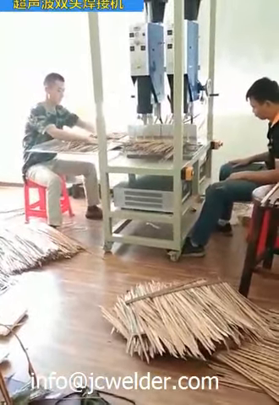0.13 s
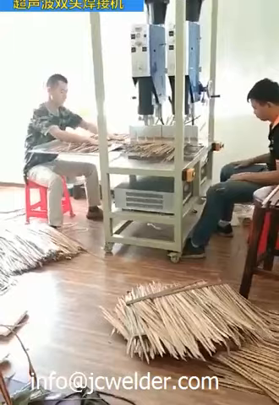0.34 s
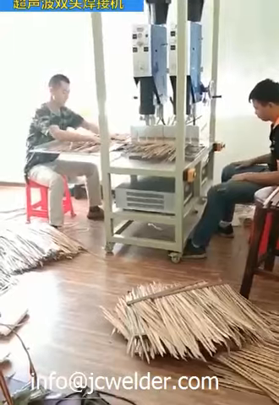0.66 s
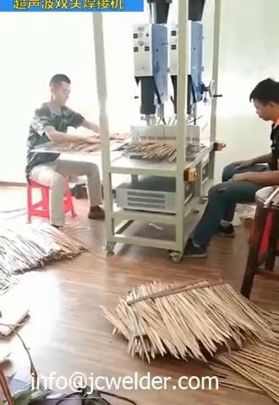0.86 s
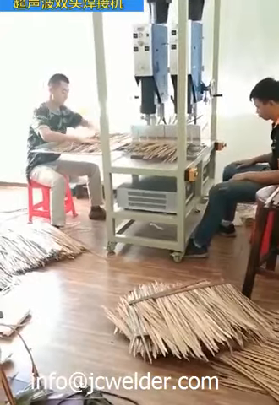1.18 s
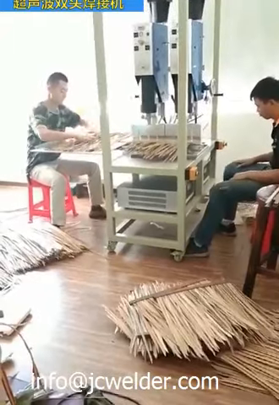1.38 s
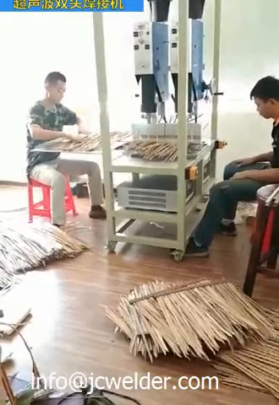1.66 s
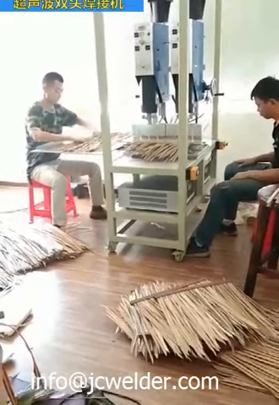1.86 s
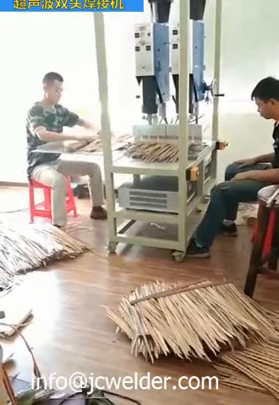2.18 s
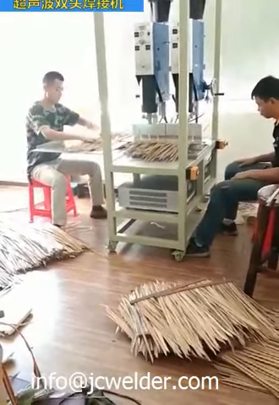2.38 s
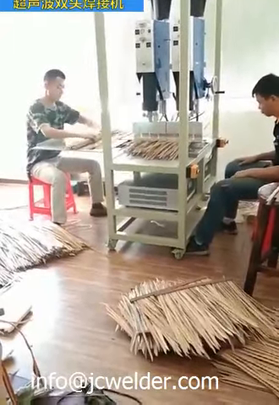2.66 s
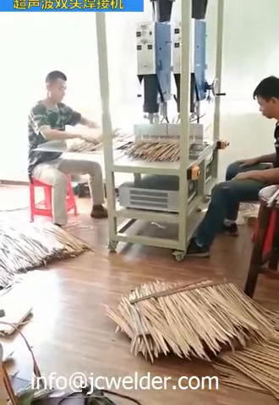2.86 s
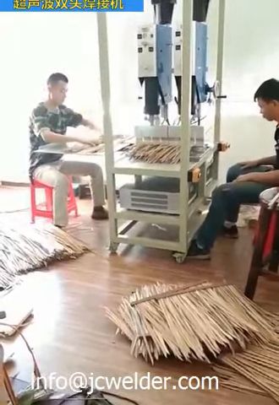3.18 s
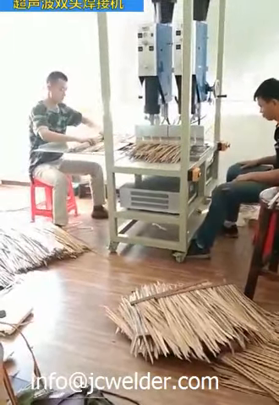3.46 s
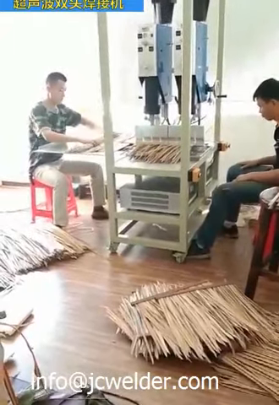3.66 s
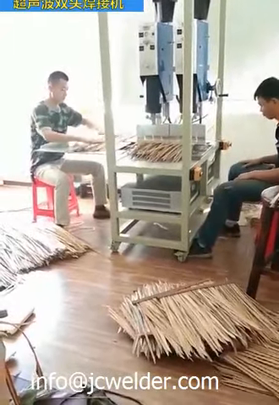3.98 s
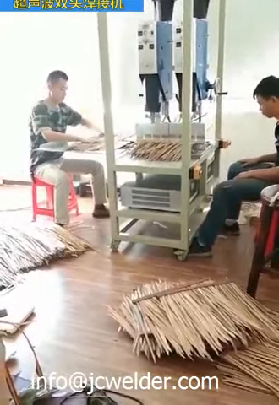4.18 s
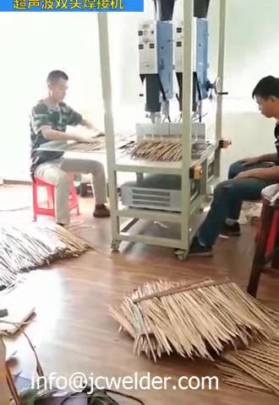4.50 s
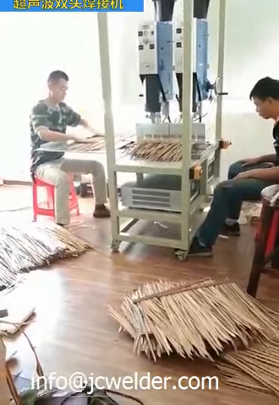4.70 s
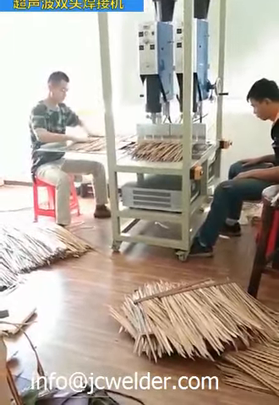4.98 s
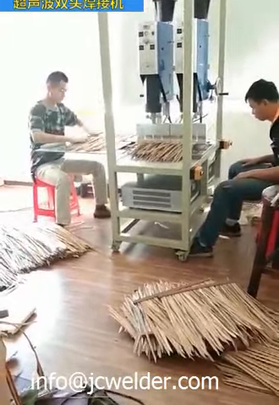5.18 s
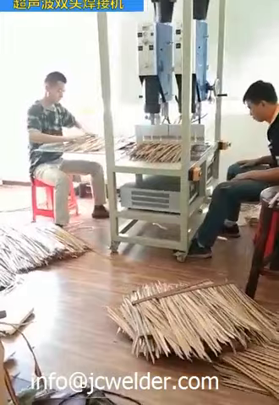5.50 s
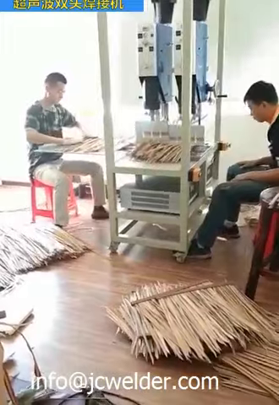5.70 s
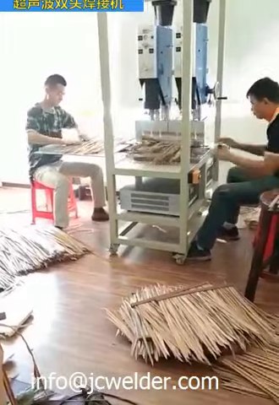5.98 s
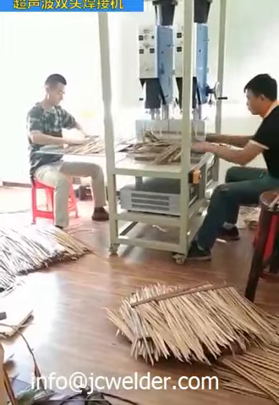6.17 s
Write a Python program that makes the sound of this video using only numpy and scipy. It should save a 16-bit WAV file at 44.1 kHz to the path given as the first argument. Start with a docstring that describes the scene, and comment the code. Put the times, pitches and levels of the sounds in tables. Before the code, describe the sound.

One microphone in a bare, lively room: scratchy, crackling high squeal from a welding horn, rough at first, then a fast regular chatter, then a clean shrill buzz with small steel clinks. It stops abruptly. Handfuls of straw-like plastic slide across a table above beating motors and fan rush. Near the end come a small click, double metallic clack, a short burst of venting air, and final rustles.

```python
"""An ultrasonic welder presses straw-like plastic strips in a hard workshop, heard at one microphone. Its 15 kHz horn
chatters on the work, throwing off a whine at half and a rasp at a quarter of its pitch, then stops. Strips rustle on
the table, a valve clicks, the rams knock and air escapes as they lift: shaped noise, much of it through resonances.
Two motors beat against each other as summed cosines; the horn holds the gain control down while it runs."""
import sys
import numpy as np
from scipy import signal
from scipy.fft import rfft, irfft, next_fast_len
from scipy.io import wavfile
from scipy.ndimage import uniform_filter1d, map_coordinates

SR = 44100
rng = np.random.default_rng(int(sys.argv[2]) if len(sys.argv) > 2 else 0)


def store_wav(level_fs):
    """Save 16-bit WAV to argv[1]."""
    pcm = np.round(np.clip(np.atleast_2d(level_fs), -1, 1) * 32767)
    wavfile.write(sys.argv[1], SR, pcm.T.astype(np.int16))


N = 279585

# All levels are relative: mix gains and the gain control come after them.
HORN_HZ, WELD_END_S = 14912, 2.86
RATTLE_HZ, RATTLE_AT_S = 24.7, 1.984  # rate of the regular rattle, and a moment when its cycle starts
# how the horn bounces, the rest being irregular: (time [s], regular rattle [share 0-1], even buzz [share 0-1])
HORN_CONTACT = [(0, 0, 0), (.6, .1, 0), (1.5, .15, 0), (1.75, .68, 0), (2.0, .93, 0), (2.22, .92, 0),
                (2.33, .55, 0), (2.47, .65, 0), (2.52, .4, .1), (2.56, 0, .96), (2.86, 0, .99)]
# hard bounces in each rattle cycle: (time from the cycle's start [s], strength [0-1])
HARD_BOUNCES = [(-.0178, 1), (-.0105, .65), (0, .9)]
# steel touching steel: (frequency [Hz], level per Hz [dB])
STEEL_TOUCH = [(700, -19), (1300, -3), (2000, -10), (3300, 6), (4500, -2), (5300, -36)]


def amp(db):
    """Decibels to gain."""
    return 10 ** (np.asarray(db) / 20)


def unit(x):
    """Scale to rms 1."""
    return x / np.sqrt(np.mean(x ** 2) + 1e-20)


def clock():
    """The time of every sample in seconds."""
    return np.arange(N) / SR


def along(points, hz):
    """Interpolate (Hz, value) points on a log frequency axis."""
    f, v = np.transpose(points)
    return np.interp(np.log(hz + 1), np.log(f + 1), v)


def curves(rows):
    """One value per sample for each column after the time."""
    s, *cols = np.transpose(rows)
    return [np.interp(clock(), s, c) for c in cols]


def wobble(rate):
    """A smooth random curve, rate knots a second."""
    return map_coordinates(rng.standard_normal(int(N * rate / SR) + 4), [clock() * rate])


def filtered(x, response):
    """x times a response of frequency."""
    size = next_fast_len(N + SR // 2)
    spectrum = rfft(x, size) * response(np.fft.rfftfreq(size, 1 / SR))
    return irfft(spectrum, size)[:N]


def coloured(x, spectrum):
    """x given a spectrum, at rms 1."""
    return unit(filtered(x, lambda hz: amp(along(spectrum, hz))))


def noise(spectrum, grain_db=0, grain_rate=300):
    """Coloured noise, clumped into short grains."""
    return coloured(rng.standard_normal(N) * amp(grain_db * wobble(grain_rate)), spectrum)


def ringing(x, modes, top_hz=5100):
    """x through (Hz, width Hz, dB) resonances of alternating sign, dull above top_hz, at rms 1."""
    def response(f):
        peaks = 0
        for k, (centre, width, db) in enumerate(modes):
            peak = 1j * f * width / (centre * centre - f * f + 1j * f * width)
            peaks = peaks + (-1) ** k * amp(db) * peak
        return peaks / (1 + (f / top_hz) ** 24)
    return unit(filtered(x, response))


def wavering(modes, waver_db, waver_rate=14):
    """Noise in resonances that swell and fade each in its own way, at rms 1."""
    total = 0
    for hz, width, db in modes:
        level = amp(db + waver_db * wobble(waver_rate))
        total = total + level * ringing(rng.standard_normal(N), [(hz, width, 0)])
    return unit(total)


def gate(start, end, fade):
    """1 between two times, with sloping edges."""
    return np.clip(np.minimum(clock() - start, end - clock()) / fade, 0, 1)


def burst(start, end, attack, t60):
    """Rise, hold until the end, then an exponential fall."""
    t = clock()
    return np.clip((t - start) / attack, 0, 1) * amp(-60 * np.maximum(t - end, 0) / t60)


def blow(s, db, t60, attack=0.00024):
    """A sudden start and an exponential fall."""
    return amp(db) * burst(s, s, attack, t60)


def swell(s, half_width):
    """A bell-shaped rise and fall around a middle time."""
    return np.exp(-2 * ((clock() - s) / half_width) ** 2)


def together(envelopes):
    """Unrelated noises add in power."""
    return np.sqrt(np.sum(np.square(envelopes), axis=0))


def room(x, wet_db):
    """The direct sound plus, 5 ms behind, the diffuse answer of the bare walls, at about unchanged power."""
    # the walls' reverberation: (frequency [Hz], t60 [s])
    wall_decay = [(150, .45), (1000, .45), (4000, .4), (7500, .26), (13000, .18)]
    hz, t, z = signal.stft(rng.standard_normal(SR // 2), SR, nperseg=256)
    tail = signal.istft(z * amp(-60 * t / along(wall_decay, hz)[:, None]), SR, nperseg=256)[1]
    answer = np.pad(tail, (SR // 200, 0)) / np.linalg.norm(tail)
    echo = signal.fftconvolve(x, answer)[:N]
    return (x + amp(wet_db) * echo) / np.hypot(1, amp(wet_db))


def weld(level_db=12, horn_db=-3, chatter_db=1.1):
    """The horn's own tone, and the whine, rasp and crackle of its contact with the strips, which shakes the frame."""
    # how hard the horn chatters; drives whine and crackle: (time [s], level [dB])
    chatter_level = [(0, -34), (0.45, -33.5), (0.76, -32), (1.05, -36.3), (1.68, -37), (1.95, -31),
                     (2.14, -30), (2.26, -32.5), (2.3, -35), (2.5, -35), (2.54, -40), (2.67, -39.5),
                     (2.695, -36.5), (2.77, -36.3), (2.83, -34)]
    # the horn grabs briefly and the whine jumps: (middle [s], half width [s], rise [dB])
    grabs = [(2.381, .014, 3.5), (2.459, .02, 5), (2.835, .01, 3)]
    # the chatter catches on one pitch: (start [s], end [s], frequency [Hz], level [dB])
    caught_pitches = [(.68, 1.1, 7312, -40.5), (.7, 1.057, 7272, -48), (1.06, 1.72, 7495, -45.5),
                      (.85, 1.75, 7456, -46.5)]
    # spectra: (frequency [Hz], level per Hz [dB])
    rasp_spectrum = [(2000, -68), (3000, -17), (3400, -4.5), (3600, 0.5), (3830, 3.5), (4050, -2.5),
                     (4300, -2.5), (4600, -5), (4950, -23.5), (5400, -69), (9500, -48.5), (11200, -15),
                     (11750, -26.5), (12200, -75)]
    crackle_spectrum = [(250, -12.5), (450, -4.5), (600, -6.5), (1000, -2.5), (2000, -2), (2900, 3.5),
                        (4300, 11), (4900, 8), (5350, -19), (6600, 7.5), (9100, -39.5), (10500, -4),
                        (11700, -15.5), (12300, -65)]
    # the rasp's partials: (frequency [Hz], width [Hz], level [dB])
    partials = [(3585, 40, 5), (3700, 70, 0), (3828, 30, 6.5), (3944, 40, 0), (4291, 45, -5)]
    # resonances of bench and press frame: (frequency [Hz], width [Hz], level [dB])
    frame_modes = [(328, 8, -4), (404, 9, -1), (445, 24, 0), (497, 12, -4), (768, 6, 11), (845, 11, 6),
                   (905, 30, 1), (1370, 34, 4.5), (1515, 20, 2), (1615, 30, 1), (1750, 20, 1),
                   (2460, 67, 3)]

    whine_db, = curves(chatter_level)
    rasp_db, crackle_db = contact(whine_db)
    running = gate(-1, WELD_END_S + .02, fade=.038)
    grab_db = sum(db * swell(s, half_width) for s, half_width, db in grabs)
    squeals = 0
    for start, end, hz, db in caught_pitches:
        pitch = np.sin(2 * np.pi * hz * clock() + 0.56 * wobble(12.04))
        squeals = squeals + amp(db + 3) * gate(start, end, fade=0.011) * pitch
    tone = room(running * (amp(whine_db + grab_db + chatter_db) * whine() + squeals), wet_db=-9.5)

    scrape = bounces(rate=150, jitter=0.3, life=0.016, scatter_db=1.6)
    # the partials stand out more the harder the bite, level with the rasp at -29 dB
    tip = amp(.5 * (rasp_db + 29)) * wavering(partials, waver_db=3.5)
    rasp = amp(rasp_db - 2) * throb(depth=0.45) * (coloured(scrape, rasp_spectrum) + tip)
    crackling = bounces(rate=150, jitter=.25, life=0.024, scatter_db=1.67)
    crackle = amp(crackle_db + 9.0) * coloured(crackling, crackle_spectrum)
    shaking = bounces(rate=170, jitter=.25, life=0.0038, scatter_db=1.5)
    frame = amp(crackle_db - 1) * ringing(shaking, frame_modes)
    rough = room(running * (rasp + crackle + frame), wet_db=-9.5)
    horn = amp(horn_db) * np.sin(2 * np.pi * HORN_HZ * clock())
    return running * horn + amp(level_db) * (tone + rough)


def whine():
    """Half the horn's pitch: irregular chatter locks into a rattle, then smooths to a buzz as the plastic melts."""
    # irregular chatter: (frequency [Hz], level per Hz [dB])
    chatter_spectrum = [(5500, -50), (6400, -27), (6620, -17), (6800, -22), (7220, -16), (7290, -1),
                        (7370, -2), (7460, 0), (7540, -5), (7670, -6), (7730, -18), (8050, -23),
                        (9200, -55)]
    # rattle sidebands: (offset from half the horn's pitch [multiples of the rattle rate], level [dB])
    sidebands = [(-15, -22), (-7, -16), (-6, -9), (-5, 0), (-4, -8), (-3, -17), (-2, -8), (-1, -6), (0, -3),
                 (2, -2), (3, -19), (4, -15), (5, -12), (6, -12), (7, -13)]
    # lines of the buzz: (frequency [Hz], level [dB])
    buzz_lines = [(7192, -16), (7384, 0), (7573, -2), (7765, -22)]
    # the buzz bends as the melt gives: (time [s], shift [Hz])
    buzz_drift = [(2.55, -3), (2.68, -4), (2.78, 7), (2.84, 0), (2.88, -14)]

    t = clock()
    rattle_share, buzz_share = np.clip(curves(HORN_CONTACT), 0, 1)
    loose_share = np.clip(1 - rattle_share - buzz_share, 0, 1)
    chatter = coloured(bounces(rate=150, jitter=.25, life=.008, scatter_db=.3), chatter_spectrum)

    # the sidebands line up at each hard bounce
    when, strength = np.transpose(HARD_BOUNCES)
    kicks = strength * np.exp(2j * np.pi * rng.random(len(when)))
    rattle = 0
    for k, db in sidebands:
        phase = np.angle(kicks @ np.exp(-2j * np.pi * k * RATTLE_HZ * when))
        hz = HORN_HZ / 2 + k * RATTLE_HZ
        rattle = rattle + amp(db) * np.cos(2 * np.pi * hz * (t - RATTLE_AT_S) + phase)

    bend = np.cumsum(curves(buzz_drift)[0]) / SR
    buzz = sum(amp(db) * np.sin(2 * np.pi * (hz * t + bend) + .15 * wobble(40)) for hz, db in buzz_lines)
    loose = throb(depth=.25) * np.sqrt(loose_share) * chatter
    locked = np.sqrt(rattle_share) * unit(throb(depth=.08) * accent() * rattle)
    return loose + locked + np.sqrt(buzz_share) * unit(buzz)


def bounces(rate, jitter, life, scatter_db):
    """Short bursts of noise, one each time the horn lands on the work."""
    turns = np.cumsum(rate * np.exp(jitter * wobble(60))) / SR
    decay = np.exp(-(turns % 1) / rate / life)
    return rng.standard_normal(N) * decay * amp(scatter_db * wobble(120))


def throb(depth):
    """In the rattle the bounces crowd into one half of the cycle."""
    rattle_share = np.clip(curves(HORN_CONTACT)[0], 0, 1)
    cycle = np.cos(2 * np.pi * RATTLE_HZ * (clock() - RATTLE_AT_S + .011))
    return 1 + depth * np.sqrt(rattle_share) * cycle


def accent(bounce_db=3.6, half_width_s=.0035):
    """Gain that peaks at each hard bounce of the rattle cycle."""
    peaks = 0
    for s, strength in HARD_BOUNCES:
        turns_off = ((clock() - RATTLE_AT_S - s) * RATTLE_HZ + .5) % 1 - .5  # from the nearest such bounce
        peaks = peaks + strength * np.exp(-(turns_off / RATTLE_HZ / half_width_s) ** 2)
    return amp(bounce_db * peaks)


def contact(whine_db, rasp_waver_db=2.0, crackle_waver_db=1.1):
    """Levels in dB: the rasp surges at each bite and its rubbing dies in the melt; the crackle follows the chatter."""
    # the horn bites into the strips and the rasp surges: (start [s], length [s], level [dB])
    bite_times = [(-.02, 0.14, -31), (0.22, .02, -35), (0.278, 0.09, -28.5), (0.409, 0.08, -32.5),
                  (0.506, 0.13, -27.5), (0.76, 0.023, -32.5), (0.864, 0.076, -34.5), (1.024, .03, -32.5),
                  (1.077, .075, -31.5), (1.183, 0.11, -31), (1.303, 0.054, -34), (1.359, 0.15, -32),
                  (1.566, 0.067, -32), (1.663, 0.023, -30), (1.837, 0.052, -36.5), (2.113, 0.026, -40.5),
                  (2.36, .02, -41), (2.47, 0.045, -42)]
    bite_attack_s, bite_t60_s = 0.023, 0.29
    # the strips soften under the horn, so rubbing and crackle fade steadily
    rasp_start_db, rasp_fade_db_per_s = -35, 5.5
    crackle_start_db, crackle_fade_db_per_s = -12.5, 2.5  # crackle relative to the whine
    t = clock()
    solid = np.clip(1 - curves(HORN_CONTACT)[1], .01, 1)
    rubbing_db = rasp_start_db - rasp_fade_db_per_s * t + rasp_waver_db * wobble(20)
    rubbing = np.sqrt(solid) * amp(rubbing_db)
    bites = [amp(db) * burst(s, s + length, bite_attack_s, bite_t60_s) for s, length, db in bite_times]
    fading_db = crackle_start_db - crackle_fade_db_per_s * t
    crackle_db = whine_db + fading_db + crackle_waver_db * wobble(9.85)
    return 20 * np.log10(together([rubbing] + bites)), crackle_db


def rams(slide_db=-40):
    """Tooling clinks, the rams rumble up their guides and hit their stops with a crack and a thump."""
    # the rams hit and bounce: (time [s], level [dB], t60 [s], thump relative to the crack [dB])
    hits = [(5.455, -23.5, .11, -5), (5.462, -23.5, .05, -2), (5.4735, -29, .04, -7), (5.483, -29, .07, -7),
            (5.576, -20, .05, -8), (5.586, -27, .06, -4), (5.592, -26, .08, -4), (5.6, -26, .09, -3),
            (5.6125, -23, .025, -9), (5.633, -29, .04, -10), (5.648, -28, .03, -10)]
    # the steel tooling: (time [s], level [dB], t60 [s], ring relative to the clink [dB])
    clinks = [(2.487, -31, 0.16, -4), (2.518, -30, .07, 1), (2.828, -26, .11, -13)]
    # the crack: (frequency [Hz], level per Hz [dB])
    crack_spectrum = [(60, 2), (200, 6), (330, 6), (480, -5), (900, 1.5), (1300, 5), (1700, 5), (2200, 5),
                      (3300, 9.5), (4600, 7), (5300, -21), (12000, -35)]
    # the rams' end stops: (frequency [Hz], width [Hz], level [dB])
    stop_modes = [(324, 85, 5), (438, 90, 4), (890, 61, 3.5), (1182, 27, -0.5), (1670, 370, -5.5)]

    cracks = [blow(s, db, t60) + blow(s, db - 4, 0.0041) for s, db, t60, _ in hits]
    clack = together(cracks) * noise(crack_spectrum, grain_db=1.5, grain_rate=900)
    slide = amp(slide_db) * gate(5.48, 5.6, fade=0.018)
    thumps = [blow(s, db + thump_db, t60) for s, db, t60, thump_db in hits]
    thump = together([slide] + thumps) * ringing(rng.standard_normal(N), stop_modes)
    touches = sum(blow(s, db - 1.5, t60, attack=.002) for s, db, t60, _ in clinks)
    ticks = touches * noise(STEEL_TOUCH)
    ring = sum(steel(s, db + ring_db) for s, db, _, ring_db in clinks)
    return room(clack + thump + ticks + ring, wet_db=-7)


def steel(s, db):
    """The tooling rings on, each mode at its own length."""
    # (frequency [Hz], level [dB], t60 [s])
    steel_modes = [(1625, -5.5, .22), (2160, -12, .17), (3450, 0, .2), (4340, -4, .2)]
    total = 0
    for hz, level, t60 in steel_modes:
        partial = np.sin(2 * np.pi * hz * clock() + 1.1 * wobble(130))
        total = total + blow(s, db + level + 3, t60, attack=.004) * partial
    return total


def valve(ring_t60=.09, tick_db=-4, tick_t60=0.11):
    """The air valve's slide snaps over just before the rams lift and rings its body."""
    # the valve body: (frequency [Hz], width [Hz], level [dB])
    body_modes = [(1288, 120, -5), (2250, 160, -9), (3290, 64, -2.5)]
    snap_s, snap_db = 5.398, -33
    ring = blow(snap_s, 0, ring_t60, attack=0.0033) * ringing(rng.standard_normal(N), body_modes)
    tick = blow(snap_s, tick_db, tick_t60, attack=.003) * noise(STEEL_TOUCH)
    return room(amp(snap_db) * (ring + tick), wet_db=-1.5)


def exhaust():
    """Air sputters out of the cylinders and rings their ports; a faint high hiss is heard near the end."""
    # the jet of air: (frequency [Hz], level per Hz [dB])
    jet_spectrum = [(290, -27), (500, -20), (535, -10.5), (596, -24), (921, -14.5), (999, -20), (1840, -16),
                    (2080, -11.5), (3040, -7), (4380, 0), (5100, -13), (6700, -15.5), (7000, -20.5),
                    (8200, -22.5), (10400, -18), (12800, -22.5), (16600, -58)]
    # the exhaust ports: (frequency [Hz], width [Hz], level [dB])
    port_modes = [(2780, 70, -5), (3240, 50, -3), (4030, 49, 0.5), (4270, 64, 0), (4470, 76, 3),
                  (4740, 48, 3)]
    # faint high hiss near the end: (frequency [Hz], level per Hz [dB])
    faint_hiss_spectrum = [(4000, -30), (6800, -4), (8000, -7), (9500, -1), (11000, 5), (12200, -4),
                           (12700, -30)]
    jet = amp(-2.5) * airflow(spurt_db=6) * noise(jet_spectrum)
    # the ports ring hardest under full pressure
    ports = amp(-8) * airflow(spurt_db=12.5) * wavering(port_modes, waver_db=3.5, waver_rate=25)
    sputter = amp(.7 * wobble(300) + .7 * wobble(45))
    faint_hiss = amp(-64.5) * gate(5.8, 7, fade=.05) * noise(faint_hiss_spectrum)
    return room(sputter * (jet + ports) + faint_hiss, wet_db=-8.5)


def airflow(spurt_db):
    """Stored pressure makes each venting open with a spurt, settle while its ram travels, then die away."""
    # each ram's cylinder vents as it lifts: (valve opens [s], cylinder empty [s], flow [dB])
    ventings = [(5.437, 5.796, -30.5), (5.568, 5.802, -27.5)]
    opening_s, vent_t60_s, spurt_s = 0.033, 0.35, 0.064
    flows = []
    for s, empty, db in ventings:
        extra_db = spurt_db * np.exp(-np.maximum(clock() - s, 0) / spurt_s)
        flows.append(amp(db + extra_db) * burst(s, empty, opening_s, vent_t60_s))
    return together(flows)


def strips(brightening=1.316):
    """Handfuls of dry strips rustle on the table, crisper in the louder strokes."""
    # the dry rustle: (frequency [Hz], level per Hz [dB])
    straw_spectrum = [(530, -19), (900, -16), (930, -4.5), (1290, -13.5), (1920, -12), (2190, -2.5),
                      (3410, -2), (4290, 4.5), (5440, -16), (7780, -25), (10300, -33), (12000, -69.5),
                      (15600, -75), (22000, -120)]
    # its crisp edge, same columns
    crisp_spectrum = [(4000, -28.0), (6000, 5.0), (8000, -4), (11200, -1.0), (12500, -38)]
    level_db = handling()
    rustle = amp(level_db - .5) * noise(straw_spectrum, grain_db=1.5, grain_rate=390)
    crisp = amp(brightening * level_db - 8.5) * noise(crisp_spectrum, grain_db=2.0, grain_rate=200)
    return room(gate(2.8, 7, fade=0.071) * (rustle + crisp), wet_db=-10.5)


def handling(shuffle_db=-55):
    """Level in dB of the rustle: strokes swell and fade with the hand's speed over a faint shuffle."""
    # a handful of strips slides across the table: (middle [s], half width [s], level [dB])
    slides = [(2.9, 0.21, -41), (3.266, 0.22, -43), (3.553, 0.18, -48.5), (3.76, 0.14, -41.5),
              (3.966, 0.13, -43), (4.142, 0.1, -43.5), (4.246, 0.12, -41), (4.472, 0.13, -46.5),
              (4.663, 0.091, -45), (4.847, 0.041, -38), (5.048, 0.066, -49), (5.24, 0.052, -45.5),
              (6.042, 0.28, -45.5), (6.19, 0.045, -42), (6.257, 0.043, -37), (6.33, 0.044, -42.5)]
    strokes = [amp(db) * swell(s, half_width) for s, half_width, db in slides]
    return 20 * np.log10(np.hypot(together(strokes), amp(shuffle_db)))


def motors():
    """Two nearly equal motors throb against each other over the rush of their fans; the generator hums in the weld."""
    # the first motor sags under the weld's load: (time [s], speed [Hz])
    first_speed = [(0, 210.7), (2.8, 210.7), (3.6, 212.3), (6.3, 212.3)]
    # how far the second runs below the first: (time [s], difference [Hz])
    speed_gap = [(0, 6.8), (4.6, 6.9), (4.9, 6.3), (6.3, 6.25)]
    # hum: (multiple of motor speed, first motor level [dB], second motor level [dB])
    hum_levels = [(1, -49.4, -50.2), (2, -63, -56), (3, -72, -66), (4, -65, -56.5)]
    # rush of the cooling fans: (time [s], level [dB])
    fan_level = [(0, -44), (.8, -44.5), (1.2, -48), (3.2, -48.5), (3.6, -46.5), (4.0, -45), (4.6, -45.5),
                 (6.3, -45)]
    # colour of that rush: (frequency [Hz], level per Hz [dB])
    fan_spectrum = [(35, -6), (55, -5), (130, 2), (230, 0.5), (310, 2.5), (400, 1), (560, -8.5),
                    (720, -4.5), (850, -2.5), (1100, -7), (2000, -8), (4400, -12), (5400, -32),
                    (12000, -56)]
    in_step_s = 4.85  # the motors align here, but for their small phase wobbles
    generator_hz, generator_db = 200, -52  # mains hum under load

    t = clock()
    first = np.cumsum(curves(first_speed)[0]) / SR + .02 * wobble(4)
    slip = np.cumsum(curves(speed_gap)[0]) / SR
    second = first - slip + np.interp(in_step_s, t, slip) + .03 * wobble(5)
    hum = 0
    for k, first_db, second_db in hum_levels:
        hum = hum + amp(first_db) * np.cos(2 * np.pi * k * first)
        hum = hum + amp(second_db) * np.cos(2 * np.pi * k * second)
    loaded = gate(-1, WELD_END_S, fade=.04)
    generator = amp(generator_db) * loaded * np.sin(2 * np.pi * generator_hz * t)
    fans = amp(curves(fan_level)[0] + wobble(8.9)) * noise(fan_spectrum)
    return hum + generator + fans


def scene():
    """Everything at one microphone."""
    return (weld() + rams() + valve() + exhaust() + strips() + motors())[None]


def record(dry, ceiling_db=-18, recovery_db=13, low_hz=48, top_hz=12800):
    """Gain ducks at once and recovers by recovery_db a second; the band limit then removes the horn's own tone."""
    power = np.abs(uniform_filter1d(dry[0] ** 2, size=1024))
    level_db = 10 * np.log10(power + 1e-12)
    climb = recovery_db * clock()
    gain_db = np.minimum.accumulate(np.minimum(ceiling_db - level_db, 0) - climb) + climb
    held = dry[0] * amp(gain_db) * gate(0, N / SR, fade=0.00075)

    def band(hz):
        return np.minimum(hz / low_hz, 1) ** 4 * np.clip((top_hz - hz) / 200, 0, 1)
    return filtered(held, band)[None]


dry = scene()
out = record(dry)
store_wav(out)
```